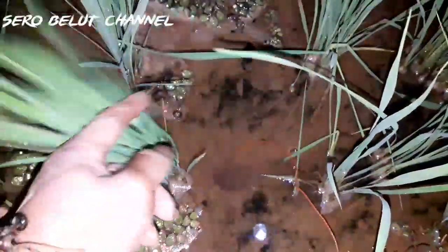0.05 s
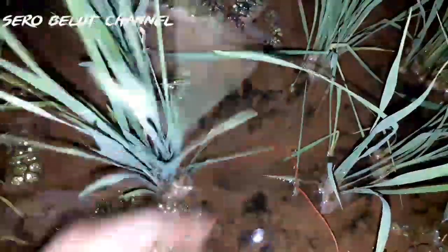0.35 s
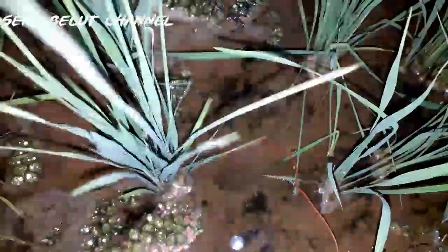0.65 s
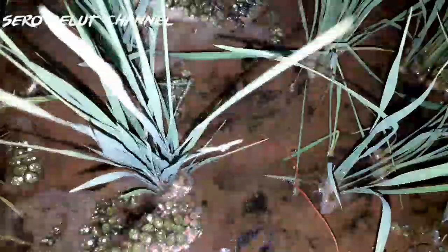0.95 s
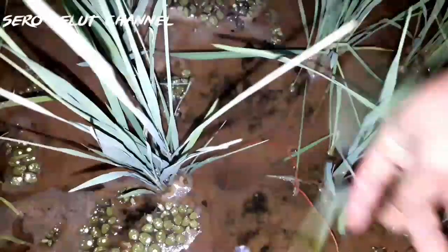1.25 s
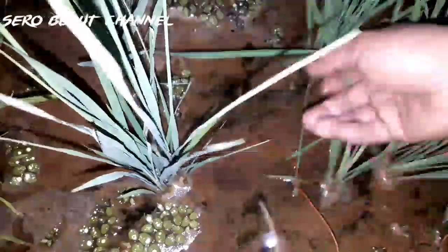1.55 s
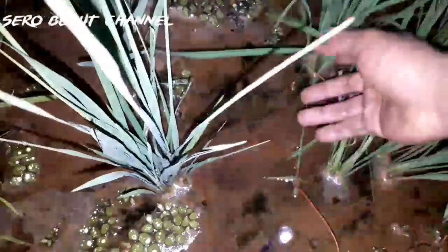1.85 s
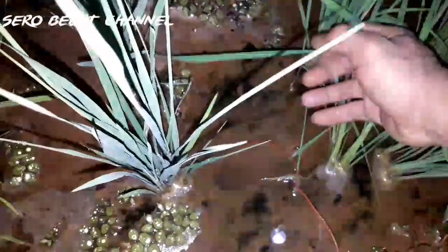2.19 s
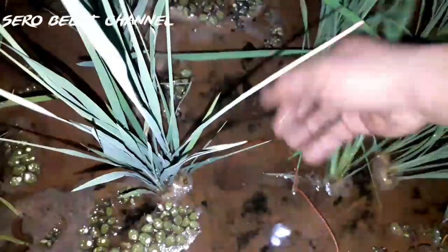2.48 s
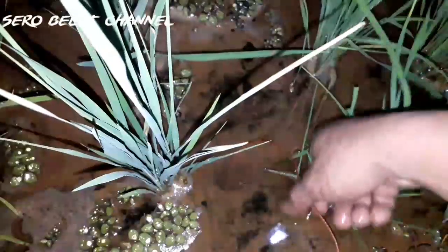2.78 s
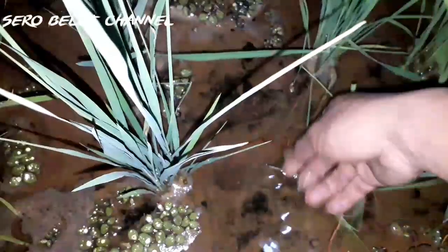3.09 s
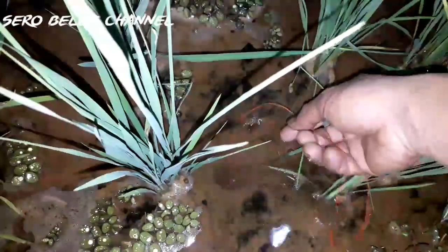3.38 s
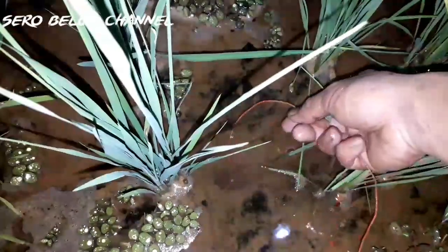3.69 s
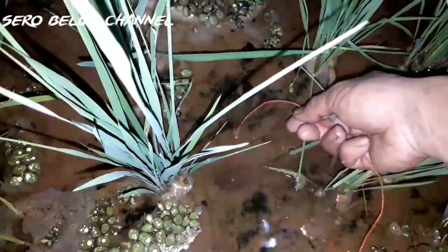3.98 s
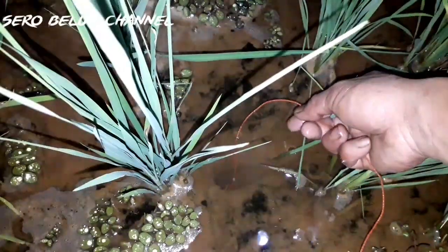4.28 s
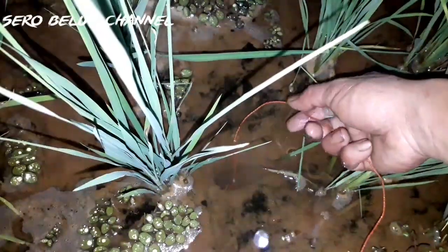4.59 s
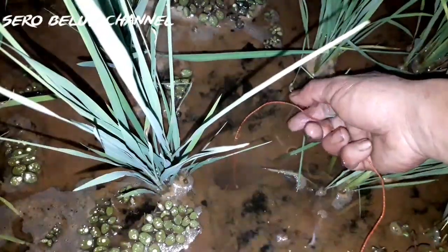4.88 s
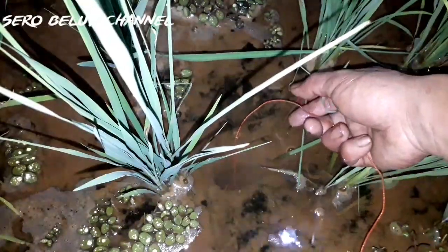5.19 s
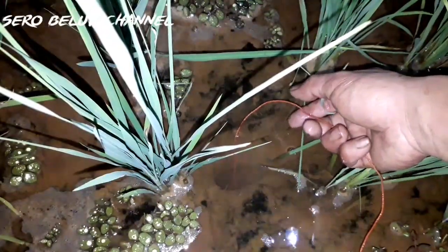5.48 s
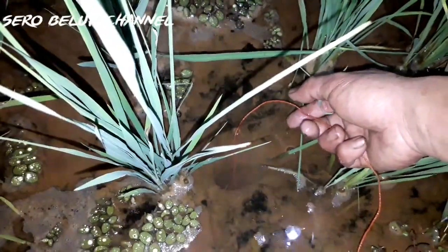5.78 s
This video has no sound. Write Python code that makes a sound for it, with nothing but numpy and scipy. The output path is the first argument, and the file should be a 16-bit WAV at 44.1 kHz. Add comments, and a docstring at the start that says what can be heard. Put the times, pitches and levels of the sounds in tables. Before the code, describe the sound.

Frogs call throughout in short, fast rattles, some close to the microphone and many farther off across a wet field at night. Early on, rice leaves swish and click against a hand close by. Then high, evenly pulsing cricket chirps build, and the hand makes a few small squelchy dabs in the mud. Stiff leaves tick now and then while the chorus gradually swells.

```python
"""Night in a flooded rice field. From the start, frogs puff air into their throat sacs and rattle, two of
them close by, over a far chorus; a deeper frog croaks now and then and a bush cricket rubs its wings.
Around 1 to 2 s a hand brushes through the rice leaves and the cricket is hushed. Then it grows louder,
a higher cricket creeps in, and the hand dabs at the wet mud. A faint hum passes at 4.4 s, and the
chorus keeps slowly swelling to the end."""
import sys
import numpy as np
from scipy import signal
from scipy.fft import rfft, irfft
from scipy.io import wavfile
from scipy.ndimage import uniform_filter1d

SR = 44100
rng = np.random.default_rng(int(sys.argv[2]) if len(sys.argv) > 2 else 0)


def store_wav(level_fs):
    """Save 16-bit WAV to argv[1]."""
    pcm = np.round(np.clip(np.atleast_2d(level_fs), -1, 1) * 32767)
    wavfile.write(sys.argv[1], SR, pcm.T.astype(np.int16))


N = 257968
TIME = np.arange(N) / SR
FROG_PULSE_S = .01438   # time from one puff of air to the next

# the tones in a close frog's voice: (pitch multiple [x], level [dB], head start [s], rise time [s])
CLOSE_TONES = [(1, 0, 0.0025, 0.0027), (1.07, -15, 0.0079, 0.0013), (.465, -28, .007, 0.0064),
               (1.55, -28.5, 0.0011, 0.0016), (2.05, -43, 0.0036, 0.00068)]
# calls of the leading frog and of its rival: (time [s], level [dB])
LEADER_RATTLES = [(0.2382, -22.5), (0.7747, -24), (1.1062, -22), (1.5496, -22.5), (2.008, -21.5),
                  (2.703, -19.5), (2.963, -18.5), (3.2396, -18.5), (3.5133, -17.5), (3.788, -18),
                  (4.1066, -18), (4.3904, -17.5), (4.6656, -18), (5.0, -18), (5.3901, -19), (5.757, -26)]
RIVAL_RATTLES = [(0.2734, -23), (0.6648, -22), (2.4557, -18.5), (2.7357, -20.5), (2.9884, -20.5),
                 (3.2476, -22.5), (3.5088, -19), (5.1162, -24.5), (5.3856, -21), (5.653, -23)]
def close_frogs(pulses=10, hz=2767, rival_pulses=8, rival_hz=2593):
    """One frog repeats its rattle, and a lower rival often cuts in."""
    leader = frog_calls([(s, pulses, db, hz) for s, db in LEADER_RATTLES], CLOSE_TONES,
                        uneven_db=1.5, first_db=-10, last_db=-2.5, build_up=.6, waver=.006)
    rival = frog_calls([(s, rival_pulses, db, rival_hz) for s, db in RIVAL_RATTLES], CLOSE_TONES,
                       uneven_db=0, first_db=-5, last_db=-3, fall=0.024, build_up=2.4, waver=.006)
    return leader + rival


def frog_calls(calls, voice, uneven_db, first_db, last_db=-4.5, fall=0.019, build_up=1.0,
               waver=0.0099, jitter_s=.0001):
    """A call is a row of puffs. It starts softly; as the air runs out, it drops in pitch and ends weakly."""
    out = np.zeros(N)
    for start, pulses, level_db, hz in calls:
        count = round(pulses)
        for k, (loud, sharp, late) in enumerate(rng.standard_normal((20, 3))[:count]):
            soften_db = first_db * np.exp(-k / build_up) + last_db * (k == count - 1)
            gain = from_db(level_db + soften_db + uneven_db * loud)
            pitch = hz * (1 + fall * (.5 - 2 * (k / count) ** 3) + waver * sharp)
            at = start + k * FROG_PULSE_S + jitter_s * late
            for multiple, db, early_s, rise_s in voice:
                add(out, at - early_s, gain * from_db(db) * sac_pulse(pitch * multiple, rise_s))
    return out


def sac_pulse(hz, rise_s, sag=0.025, sharpness=4.3):
    """One puff through the voice box makes the throat sac ring; the pitch sags as it fades."""
    t = TIME[:SR // 60]
    age = t / rise_s
    pitch = hz * (1 - sag * (np.minimum(age, 3) - 1))
    swell = (age * np.exp(1 - age)) ** sharpness
    return swell * np.sin(phase_of(pitch))


# the tones in their voice: (pitch multiple [x], level [dB], head start [s], rise time [s])
NEIGHBOUR_TONES = [(1, -2.5, 0.0025, 0.0025), (0.4605, -15.5, .007, 0.0038), (0.74, -20, 0, 0.00091)]
# their calls: (time [s], level [dB], pitch [Hz])
NEIGHBOUR_RATTLES = [(.001, -26, 2993), (.45, -30, 2885), (0.919, -26.5, 2936), (1.315, -27, 2940),
                     (1.786, -23, 2810), (2.197, -23.5, 2906), (3.114, -24.5, 2794), (3.696, -26.5, 2963),
                     (3.995, -25, 2885), (4.855, -22.5, 2943), (5.21, -24, 2917), (5.287, -24, 3000),
                     (5.561, -27, 2825), (5.672, -24, 3050)]
def neighbour_frogs(pulses=10):
    """Frogs a few metres away rattle a little higher."""
    calls = [(s, pulses, db, hz) for s, db, hz in NEIGHBOUR_RATTLES]
    return frog_calls(calls, NEIGHBOUR_TONES, uneven_db=-1.15, first_db=-5, waver=0.0051)


# the low throat tone and two above it: (pitch multiple [x], level [dB], head start [s], rise time [s])
THROAT_TONES = [(1, -3.5, 0.0021, 0.0044), (1.308, -19.5, 0.0011, 0.0049), (2.22, -8, 0, 0.0026)]
# the low part of the rattles: (time [s], puffs [count], level [dB], pitch [Hz])
LOW_RATTLES = [(0, 10.1, -34.5, 1250), (.2, 12.7, -33, 1176), (0.348, 6.7, -39, 1380),
               (.45, 8.1, -32, 1230), (0.611, 9.4, -36.5, 1320), (0.751, 9.7, -29.5, 1200),
               (0.902, 14, -30.5, 1310), (1.109, 11.4, -31.5, 1194), (1.282, 15, -34, 1266),
               (1.56, 10.2, -37, 1230), (1.721, 14, -31, 1274), (2.01, 10.6, -28, 1266),
               (2.19, 13.7, -30.5, 1286), (2.46, 10.4, -38.5, 1215), (2.639, 12, -33.5, 1280),
               (2.948, 10, -33, 1360), (3.101, 13, -35.5, 1280), (3.241, 11.5, -30, 1280),
               (3.509, 9.6, -29.5, 1280), (3.706, 10, -36.5, 1443), (3.78, 8.6, -30.5, 1260),
               (3.992, 10.8, -32, 1270), (4.129, 10.4, -30.5, 1280), (4.382, 10.5, -27, 1280),
               (4.679, 10, -29, 1275), (4.851, 11.5, -33.5, 1362), (5.01, 11.7, -30, 1268),
               (5.19, 10.6, -29.5, 1303), (5.359, 13.6, -28.5, 1280), (5.52, 11.6, -37.5, 1280),
               (5.681, 15, -30.5, 1335)]
def low_rattle_tones():
    """A low throat tone, near 1300 Hz, sounds with the frogs' rattles."""
    return frog_calls(LOW_RATTLES, THROAT_TONES, uneven_db=0.5, first_db=-2.5, fall=0.0097,
                      waver=.008, jitter_s=0.00018)


# runs of chirping: (start [s], chirps [count])
CHIRP_RUNS = [(.057, 4), (.898, 7), (2.172, 21)]
# the cricket's pace: (time [s], time from chirp to chirp [s])
CHIRP_PACE = [(0, .186), (.44, .203), (.9, .184), (1.82, .184), (2.17, .16), (2.55, .171), (3.4, .177),
              (4.07, .177), (4.25, .186), (5.2, .18)]
# how hard it chirps, hushed while the leaves move: (time [s], level [dB])
CHIRP_LEVELS = [(.25, -32.5), (.64, -37.5), (.9, -55), (1.7, -53), (2.05, -41), (2.17, -41), (2.7, -38),
                (3.35, -35), (4.6, -33), (5.85, -33.5)]
def close_cricket(full_strokes=13.3, fewest_strokes=10, strokes_per_db=.5):
    """A bush cricket chirps in runs; harder chirps have more wing strokes, so they last longer."""
    chirps = []
    for s, count in CHIRP_RUNS:
        for _ in range(count):
            db = np.interp(s, *np.transpose(CHIRP_LEVELS))
            strokes = full_strokes + strokes_per_db * (db - CHIRP_LEVELS[-1][1])
            chirps.append((s, max(strokes, fewest_strokes), db))
            s += np.interp(s, *np.transpose(CHIRP_PACE))
    return wing_chirps(chirps, hz=7581, sweep=0.066, stroke_s=0.0067, octave_db=1.5, swell_db=5.0)


def far_cricket(start_s=2.277, beat_s=.169, strokes=13):
    """A fainter, higher cricket creeps in with an even beat."""
    beats = start_s + beat_s * np.arange(22)
    chirps = [(s, strokes, np.interp(s, [2.3, 3.6], [-62, -54.5])) for s in beats]
    return wing_chirps(chirps, hz=8350, sweep=0.1, stroke_s=0.0069, octave_db=-37, swell_db=1.5)


def wing_chirps(chirps, hz, sweep, stroke_s, octave_db, swell_db, spacing_s=.00943):
    """Each wing stroke drags tiny teeth over an edge, fast at first, so the pitch starts high."""
    out, t = np.zeros(N), TIME[:int(stroke_s * SR)]
    along = t / stroke_s
    fade = signal.windows.tukey(len(t), .8)
    octave_gain = from_db(octave_db) * along ** 2   # comes in late in the stroke
    for s, count, db in chirps:
        period_s = spacing_s * (1 + .004 * rng.normal())
        for k in range(round(count)):
            phase = phase_of(hz * (1 + sweep * (1 - along) ** 2 + .004 * rng.normal()))
            tone = fade * (np.sin(phase) + octave_gain * np.sin(2 * phase))
            gain = from_db(db + swell_db * (k / count - .5) + 0.78 * rng.normal())
            add(out, s + k * period_s, gain * tone)
    return out


# leaves stirring faintly: (time [s], swish level [dB], hiss level [dB])
LEAF_STIR = [(0, -50, -57.5), (.6, -50, -65), (1.2, -50, -62.5), (2.4, -51.5, -58), (2.95, -50, -59),
             (3.35, -53, -66), (4.5, -52.5, -69), (5.85, -51, -75)]
# leaves sliding over the hand: (start [s], length [s], swish level [dB], hiss level [dB])
HAND_BRUSHES = [(0.045, 0.11, -62, -57.5), (0.808, 0.16, -44.5, -49.5), (1.147, 0.17, -45, -59),
                (1.315, 0.2, -49, -52.5), (1.537, 0.29, -45.5, -51), (1.788, 0.333, -39, -45.5),
                (2.48, 0.079, -71, -50), (2.984, 0.098, -52, -55), (3.52, 0.13, -56, -57.5)]
def brushing(swell_db=4, edge_s=0.042):
    """How strong the swish and hiss are: each brush swells until the leaves slip off the hand."""
    times, *levels = np.transpose(LEAF_STIR)
    power = from_db([np.interp(TIME, times, db) for db in levels]) ** 2
    for s, length_s, swish_db, hiss_db in HAND_BRUSHES:
        along = np.clip((TIME - s) / length_s, 0, 1)
        touch = np.interp(TIME, [s, s + edge_s, s + length_s, s + length_s + edge_s], [0, 1, 1, 0])
        swell = from_db(swell_db * (along - 1.5))
        power += (from_db([[swish_db], [hiss_db]]) * touch * swell) ** 2
    return np.sqrt(power)


# the tone of the leaves' swish and of their fine hiss: (frequency [Hz], relative level [dB])
SWISH_COLOUR = [(350, -17), (580, 0), (800, -2.5), (1500, 2.5), (3000, 3), (5000, 4.5), (6500, 0.5),
                (8000, 1), (9500, -21)]
HISS_COLOUR = [(8000, -14), (10000, -16.5), (12000, -5.5), (14000, 0.5), (15500, 3), (16000, -13)]
# stiff leaves snapping: (time [s], level [dB], extra treble [dB])
LEAF_SNAPS = [(0.619, -25, -23.5), (1.245, -26, -18), (1.656, -23, -22), (1.7354, -19.5, -20),
              (2.309, -41, 0), (2.5444, -39, 2.5), (2.63, -30, -17), (3.25, -30.5, -11), (3.435, -22, -12),
              (4.0196, -32, -10.5), (4.75, -41, -6), (4.9706, -46, 4), (5.23, -27, -6)]
def leaves(catches_per_s=60):
    """Leaves rub with a grainy swish and catch with tiny clicks; now and then a stiff one snaps."""
    swish, hiss = brushing()
    grain = from_db(0.83 * drift(250) + 1.15 * drift(25))
    rub = grain * (swish * noise(SWISH_COLOUR) + hiss * noise(HISS_COLOUR))
    catches = (rng.random(N) < catches_per_s / SR) * rng.standard_normal(N)
    clicks = swish * from_db(2) * band(catches, 2800, 5900)
    clicks += hiss * from_db(23) * band(catches, 11500, 15000)
    t = TIME[:SR // 40]
    for s, db, treble_db in LEAF_SNAPS:
        crack = from_db(db) * rng.standard_normal(len(t)) * np.exp(-t / 0.0012)
        add(clicks, s, band(crack, 4400, 6900) + from_db(treble_db) * band(crack, 9000, 15000))
    return rub + clicks


# dabs in the mud: (time [s], level [dB], first pitch [Hz], last pitch [Hz], length [s])
MUD_DABS = [(2.152, -49.5, 510, 172, 0.0093), (3.005, -29, 670, 158, 0.018),
            (3.98, -48.5, 1070, 150, 0.017), (4.103, -30.5, 1383, 144, 0.013),
            (4.232, -43, 262, 134, 0.011), (4.346, -42, 574, 128, 0.01)]
def mud(pocket_hz=235):
    """Squelchy plops drop in pitch as the mud gives way; a pocket of air rings on briefly."""
    out = np.zeros(N)
    for s, db, start_hz, end_hz, length_s in MUD_DABS:
        along = np.linspace(0, 1, int(length_s * SR))
        plop = np.sin(phase_of(end_hz + (start_hz - end_hz) * (1 - along) ** 3))
        wet_noise = rms_one(band(rng.standard_normal(len(along)), 380, 1050))
        squelch = from_db(8) * wet_noise * (1 - along) ** 2
        add(out, s, from_db(db) * np.sin(np.pi * along ** 1.83) * (plop + squelch))
    return out + from_db(-2.5) * ring(out, pocket_hz, fade_s=0.2)


# a deeper frog far away: (time [s], level [dB])
DEEP_CROAKS = [(0.359, -43.5), (1.001, -42.5), (1.97, -48), (2.82, -43), (3.42, -46), (4.408, -43.5),
               (5.361, -44)]
def deep_frog(pulse_hz=105, sag=0.017, throat_hz=960, length_s=0.11):
    """A buzzy croak: quick pulses, slowing a little, ring low in the throat."""
    out, t = np.zeros(N), TIME[:int(length_s * SR)]
    phase = phase_of(pulse_hz * (1 - sag * t / length_s))
    buzz = sum(np.cos(k * phase) / (1 + ((k * pulse_hz - throat_hz) / 110) ** 4) for k in range(6, 13))
    croak = buzz / np.abs(buzz).max() * np.sqrt(np.hanning(len(t)))
    for s, db in DEEP_CROAKS:
        add(out, s, from_db(db) * croak)
    return out


# the farthest frogs, blended into a smooth wash: (frequency [Hz], relative level [dB])
WASH_COLOUR = [(700, -33), (980, -11.5), (1280, -2), (1500, -20.5), (1950, -19), (2300, -5.5), (2850, -4.5),
               (3300, -11.5), (3750, -19), (5000, -34.5), (5750, -10.5), (6500, -44)]
def chorus(level_db=-40.5, growth_db_per_s=0.28, lull_db=-3, blend_s=0.051):
    """The crowd of frogs slowly grows louder, and sinks in the gaps between the low rattle tones."""
    calling = np.max([(TIME > s) & (TIME < s + pulses * FROG_PULSE_S)
                      for s, pulses, _, _ in LOW_RATTLES], axis=0)
    lull = 1 - uniform_filter1d(calling * 1., int(blend_s * SR))
    low = from_db(-10) * frog_crowd(hz=1280, spread=0.03, rise_s=0.0041, count=90)
    middle = from_db(-13.5) * frog_crowd(hz=1650, spread=0.12, rise_s=0.0023, count=70)
    high = from_db(-1) * frog_crowd(hz=2818, spread=0.055, rise_s=0.0022, count=150)
    wash = from_db(-2.5) * noise(WASH_COLOUR)
    return from_db(level_db + growth_db_per_s * TIME + lull_db * lull) * (low + middle + high + wash)


def frog_crowd(hz, spread, rise_s, count):
    """Many frogs call at random, each with its own pitch and pace, blurred by echoes."""
    out = np.zeros(N)
    for k in range(count):
        middle_s = (k + rng.random()) / count * TIME[-1]
        pitch = hz * (1 + spread * rng.triangular(-2, 0, 2))
        pulse = sac_pulse(pitch, rise_s) * from_db(5.1 * rng.normal())
        period_s = FROG_PULSE_S * (1 + .04 * rng.normal())
        for i, strength in zip(np.arange(-6, 7), np.sqrt(np.hanning(13))):
            add(out, middle_s + i * period_s + .00015 * rng.normal(), strength * pulse)
    out = with_echoes(out, db=-6.5, delay_s=0.0026, fade_s=0.085)
    return out / np.sqrt(uniform_filter1d(out ** 2, SR // 20) + 1e-9)   # even out the loudness


def hum(start_s=4.405, hz=207, level_db=-55, length_s=0.12):
    """A brief, faint, low hum."""
    out, t = np.zeros(N), TIME[:int(length_s * SR)]
    tone = sum(np.sin(2 * np.pi * k * hz * t) / k for k in range(1, 4))
    add(out, start_s, from_db(level_db) * np.hanning(len(t)) * tone)
    return out


# the tone of the night air: (frequency [Hz], relative level [dB])
AIR_COLOUR = [(15, -32.5), (25, -9.5), (102, 3), (387, -2.5), (533, 0.5), (625, -8), (800, -11.5),
              (1040, -42), (1760, -120)]
def open_air():
    """The low murmur of the open air."""
    return from_db(-66) * noise(AIR_COLOUR)


def with_echoes(x, db, delay_s, fade_s):
    """A sound plus its many echoes off stems and banks, which fall by 60 dB in fade_s."""
    t = TIME[:SR // 3]
    tail = rng.standard_normal(len(t)) * from_db(-60 * t / fade_s) * (t > delay_s)
    return x + from_db(db) * signal.fftconvolve(x, tail / np.linalg.norm(tail))[:N]


def ring(x, hz, fade_s):
    """Ring at one pitch, falling by 60 dB in fade_s."""
    r = from_db(-60 / (fade_s * SR))
    feedback = [1, -2 * r * np.cos(2 * np.pi * hz / SR), r * r]
    return signal.lfilter(np.array([1, 0, -1]) * (1 - r * r) / 2, feedback, x + 1e-18)


def noise(colour):
    """Noise shaped by a table of levels, dropping steeply beyond the table's ends."""
    hz, db = np.transpose(colour)
    octave, listed = np.log2(np.fft.rfftfreq(N, 1 / SR) + 1), np.log2(hz)
    outside = np.abs(octave - np.clip(octave, listed.min(), listed.max()))
    gain = from_db(np.interp(octave, listed, db) - 45 * outside)
    return rms_one(irfft(rfft(rng.standard_normal(N)) * gain, N))


def drift(steps_per_s):
    """A curve that wanders at random."""
    steps = rng.standard_normal(2000)
    return rms_one(np.interp(TIME * steps_per_s, np.arange(len(steps)), steps))


def band(x, low_hz, high_hz):
    """Keep the sound between two frequencies."""
    return signal.sosfilt(signal.butter(2, [low_hz, high_hz], "band", fs=SR, output="sos"), x + 1e-18)


def add(out, s, sound):
    """Mix a sound in at time s."""
    at = int(round(s * SR))
    first, last = max(at, 0), min(at + len(sound), N)
    if last > first:
        out[first:last] += sound[first - at:last - at]


def phase_of(hz):
    """Turn a changing pitch into the angle of a wave."""
    return 2 * np.pi * np.cumsum(hz) / SR


def from_db(db):
    """Turn decibels into a multiplier."""
    return 10 ** (np.asarray(db) / 20)


def rms_one(x):
    """Scale to an average power of 1."""
    return x / np.sqrt(np.mean(x ** 2) + 1e-20)


def scene():
    """Frogs, crickets and the hand over the night air, in one channel."""
    close, neighbours, low_tones = close_frogs(), neighbour_frogs(), low_rattle_tones()
    frogs = (with_echoes(close, db=-9.5, delay_s=0.0045, fade_s=0.15)
             + with_echoes(neighbours, db=-3.5, delay_s=0.0008, fade_s=0.097)
             + with_echoes(low_tones, db=-4, delay_s=0.0053, fade_s=0.062))
    background = open_air() + chorus() + deep_frog() + hum()
    close_chirps, far_chirps = close_cricket(), far_cricket()
    crickets = (with_echoes(close_chirps, db=-14, delay_s=0.0018, fade_s=0.062)
                + with_echoes(far_chirps, db=0, delay_s=0.0022, fade_s=0.054))
    return (frogs + crickets + leaves() + mud() + background)[None]


def record(dry, bass_hz=48, top_hz=15850):
    """A small microphone loses the deep bass; the highest treble is cut steeply."""
    thin = signal.sosfilt(signal.butter(2, bass_hz, "high", fs=SR, output="sos"), dry)
    return signal.sosfilt(signal.ellip(12, .1, 90, top_hz, fs=SR, output="sos"), thin)


dry = scene()
out = record(dry)
store_wav(out)
```